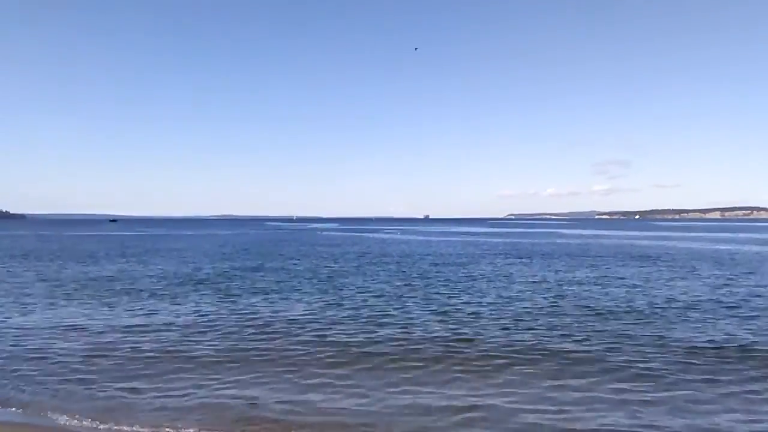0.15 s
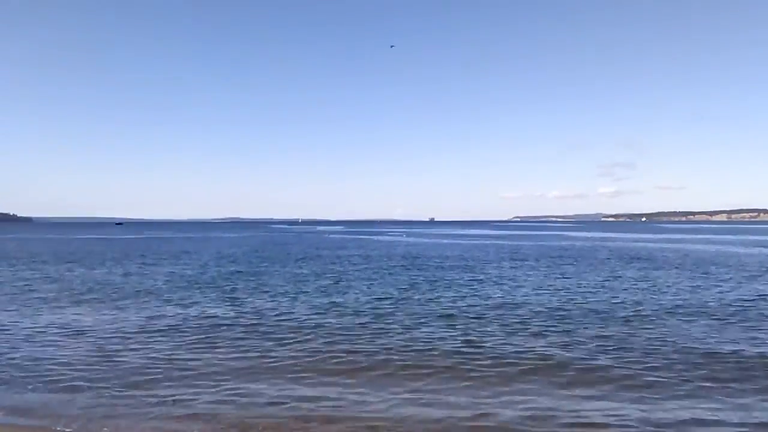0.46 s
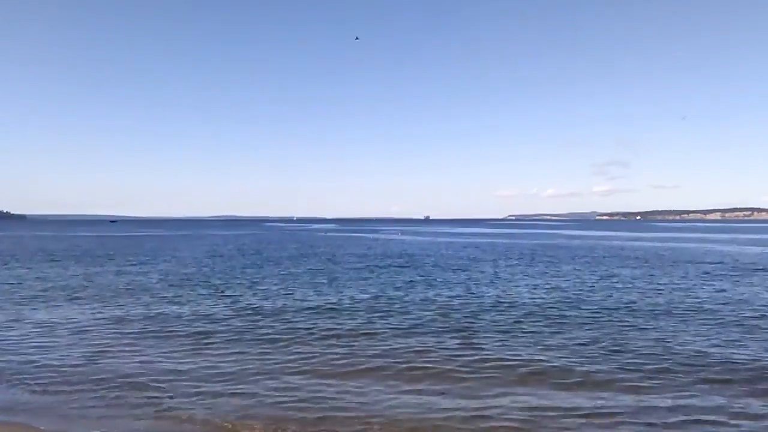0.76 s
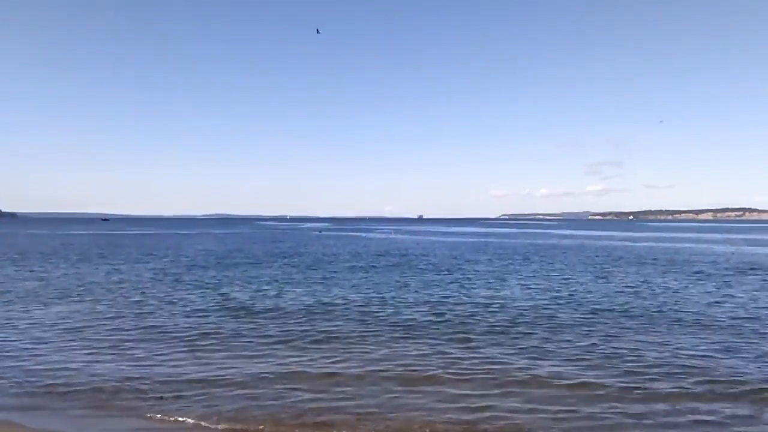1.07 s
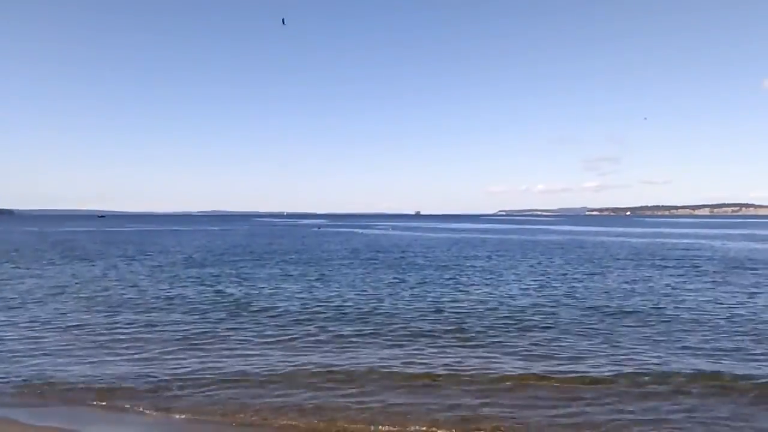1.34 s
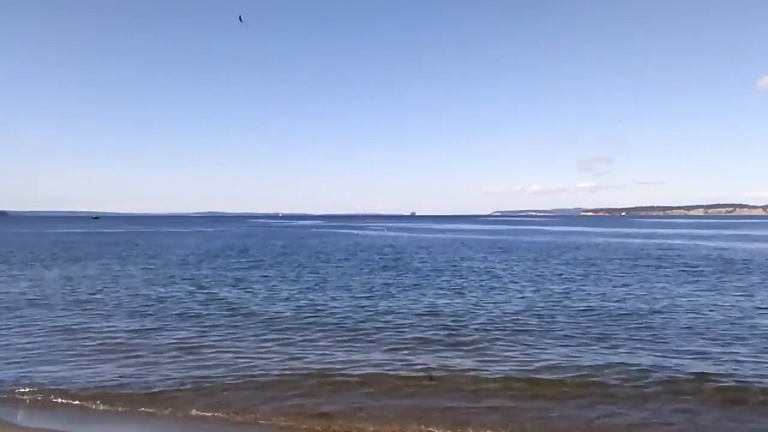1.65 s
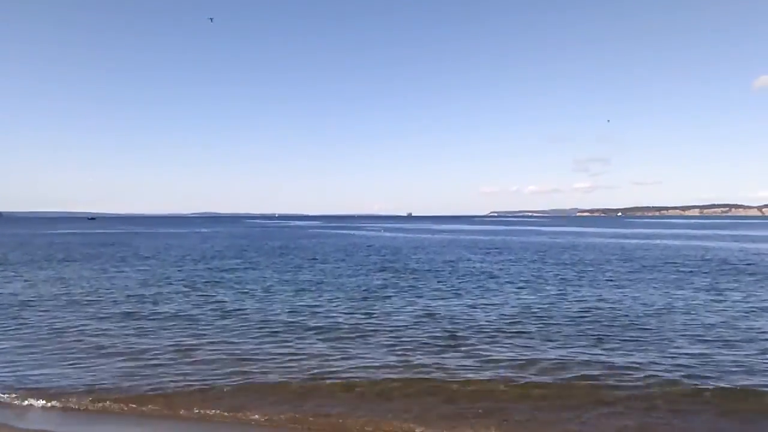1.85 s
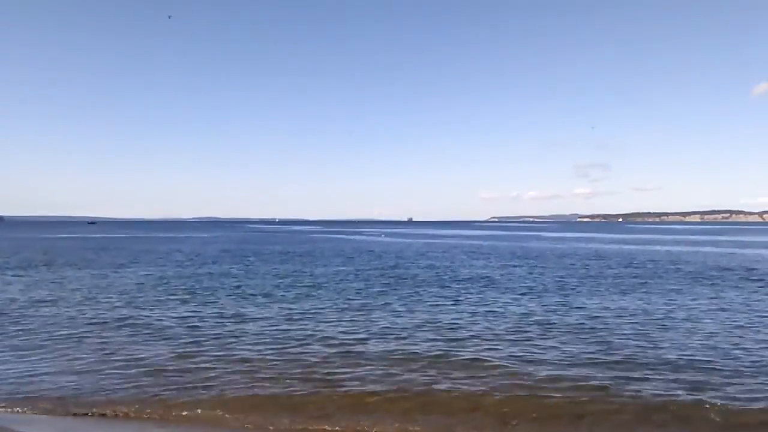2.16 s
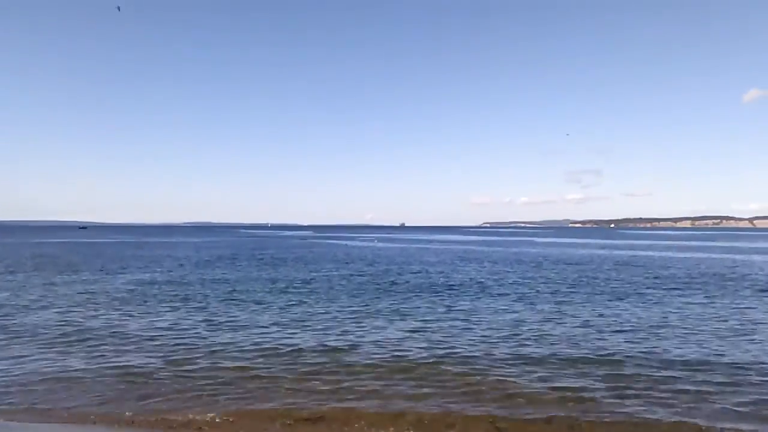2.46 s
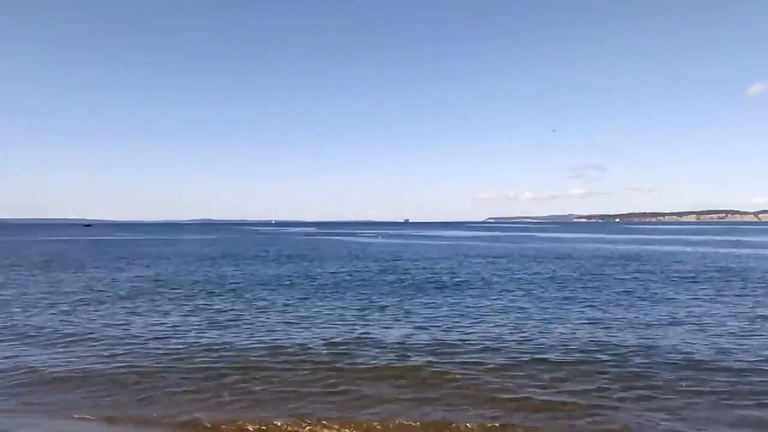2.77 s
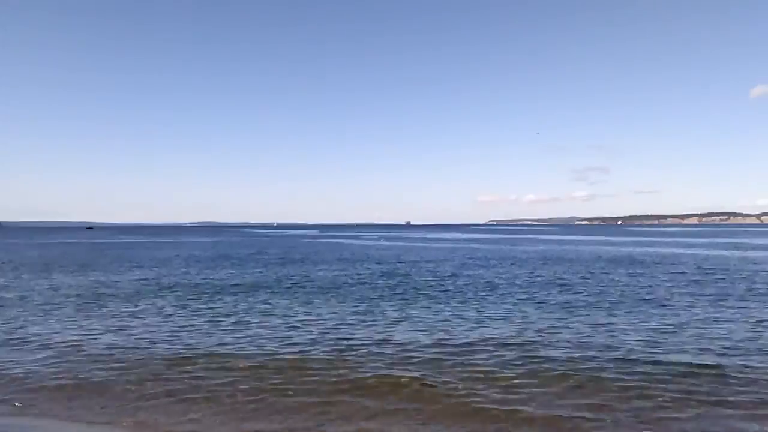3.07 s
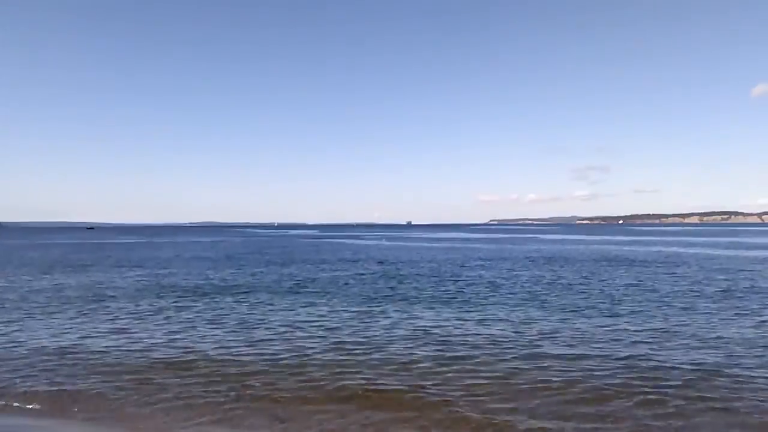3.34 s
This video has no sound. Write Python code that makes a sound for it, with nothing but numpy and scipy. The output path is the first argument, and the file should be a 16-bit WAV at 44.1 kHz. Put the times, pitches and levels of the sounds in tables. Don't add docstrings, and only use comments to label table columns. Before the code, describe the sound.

Foamy wavelets lap the shore in overlapping swells, the last and loudest near three seconds with plops and splashes; outdoors, hand-held stereo microphone at the water's edge, soft low wind buffeting.

```python
import sys
import numpy as np
from scipy import signal
from scipy.fft import rfft, irfft, next_fast_len
from scipy.io import wavfile
from scipy.ndimage import uniform_filter1d, map_coordinates

SR = 44100
rng = np.random.default_rng(int(sys.argv[2]) if len(sys.argv) > 2 else 0)


def store_pcm(level_fs):
    pcm = np.round(np.clip(level_fs, -1, 1) * 32767).astype(np.int16)
    wavfile.write(sys.argv[1], SR, np.atleast_2d(pcm).T)


def voltage_ratio(level):
    return 10 ** (np.asarray(level, float) / 20)


N = 154791
T = np.arange(N) / SR
HZ = np.fft.rfftfreq(next_fast_len(N + 4096), 1 / SR)

# left_lag_ms, strip_width_ms, sand_echo_0_to_1
WAVE_ANGLES = [(.285, .06, .35), (-.328, .345, .1), (-.345, .012, 0), (-.2, .26, .1)]
# port_ring_hz, fizz_db, bubbles_db
WAVE_PLACES = [(10890, -6, -4.5), (11370, -1.5, -1.5), (11100, -15.5, 0), (11440, -1.5, -4)]
# left_ms, left_share, right_ms, right_share
BODY_ECHOES = [(.178, .9, .0735, .8), (.1, .1, .19, .2), (.18, .05, .2, .3), (.1, .1, .19, .3)]


def wave(swell, span_s, angle, place, body):
    # freq_hz, level_db
    foam_colour = [(250, 7), (650, 6), (1050, 7), (1650, 8.5), (2600, 6.5), (5000, 2.5), (9500, -0.5),
                   (14500, -1)]
    sand_ms, edge_s = .092, 0.27
    s, level_db, bright_db = np.transpose(swell)
    lag_ms, width_ms, sand = angle
    ring_hz, fizz_db, bubbles_db = place

    since_start_s = T - s[0] + .5 * edge_s
    until_end_s = s[-1] - T + .5 * edge_s
    edge = np.clip(np.minimum(since_start_s, until_end_s) / edge_s, 0, 1)
    swelling = edge * voltage_ratio(np.interp(T, s, level_db))
    brightening = voltage_ratio(np.interp(T, s, bright_db))
    top = HZ ** 2 / (HZ ** 2 + 2400 ** 2)
    colour = voltage_ratio(read(foam_colour, HZ)) * (1 + sand * delay(sand_ms)) / (1 + .5 * sand)

    out = 0
    for place_on_strip in (-.5, -.1, .5):
        foam = hiss(2.43, 1.37, *span_s)
        foam = foam + voltage_ratio(fizz_db) * grains(2500, 12900, 2.11, 900, 3.1, count=8)
        foam = shaped(foam, colour)
        foam = foam + .3 * voltage_ratio(bubbles_db) * grains(450, 2600, 7, 90, 5, count=8)
        high = shaped(foam, top)
        foam = (foam - high + high * brightening) * swelling
        out = out + ports(foam, lag_ms + place_on_strip * width_ms, ring_hz, *body)
    return voltage_ratio(-4.5) * out


def hiss(patchy_db, flicker_db, from_s=0., to_s=9.):
    span = (T >= from_s) & (T <= to_s)
    z = signal.stft(rng.standard_normal(N)[span], nperseg=256)[2]
    frames = z.shape[1]
    patches = rng.standard_normal((129, frames))
    patches = uniform_filter1d(patches, size=3, axis=0)
    patches = evened(uniform_filter1d(patches, size=14, axis=1))
    flicker = evened(uniform_filter1d(rng.standard_normal(frames), size=8))
    z = z * voltage_ratio(patchy_db * patches + flicker_db * flicker)
    out = np.zeros(N)
    out[span] = evened(signal.istft(z, nperseg=256)[1][:span.sum()])
    return out


def grains(lo_hz, hi_hz, cycles, per_s, spread_db, count):
    out = np.zeros(N + SR)
    bubbles_per_pitch = int(per_s * N / SR / count)
    for hz in np.geomspace(lo_hz, hi_hz, count):
        when, luck = rng.random((2, bubbles_per_pitch, 1))
        one = bubble(hz, cycles, .12) * np.sqrt(hz)
        at = (when * N).astype(int) + np.arange(len(one))
        loudness = voltage_ratio(-spread_db * np.log(luck + 0.0091))
        out += np.bincount(at.ravel(), (loudness * one).ravel(), N + SR)
    return evened(out[:N])


def bubble(hz, cycles, glide):
    u = np.arange(0, 2.5, hz / cycles / SR)
    envelope = 3 * u * np.exp(1 - 3 * u)
    return np.sin(2 * np.pi * cycles * u * (1 + glide * u)) * envelope


def travel(pair, bent, scatter, drift_ms, low):
    # freq_hz, level_db, lag_rad
    bend_points = [(1400, 1, 0), (1960, 6.5, 1.38), (2510, 2, 1), (2820, 8.5, 1.15), (3900, 3.5, 1.16),
                   (5260, -4, 2.1), (7870, 9, 0), (12900, -6, 2.3)]
    # start_s, end_s
    run_s = (2.33, 2.81)
    hz, db, lag_rad = np.transpose(bend_points)
    low_lag_rad = low * 2 * HZ * 800 / (HZ ** 2 + 800 ** 2)
    bend_lag_rad = bent * read(np.c_[hz, lag_rad], HZ) + low_lag_rad
    bend = voltage_ratio(bent * read(np.c_[hz, db], HZ)) * np.exp(-1j * bend_lag_rad)

    ragged = uniform_filter1d(rng.standard_normal(len(HZ)), size=900)
    ragged = evened(uniform_filter1d(ragged, size=900))
    scattering = np.exp(1j * scatter * ragged * HZ ** 4 / (HZ ** 4 + 7000. ** 4))

    left, right = shaped(pair, np.array([bend, scattering]))
    if drift_ms:
        late_samples = np.interp(T, run_s, [0, drift_ms * 1e-3 * SR])
        left = map_coordinates(left, [np.arange(N) - late_samples], order=3)
    return np.array([left, right])


def nearby():
    # start_s, level_db, pitch_hz, ring_cycles
    single_bubbles = [(0.276, -51.5, 1023, 11), (0.294, -41, 1220, 2.1), (0.651, -43.5, 1510, 5.8),
                      (0.678, -46, 1670, 4.9), (1.253, -51, 1320, 3.2), (1.396, -34, 2350, 6.3),
                      (1.419, -40, 1420, 2.8), (1.612, -41, 1580, 6.8), (2.385, -47, 950, 3),
                      (2.402, -42, 1000, 1.9), (2.799, -36, 890, 2), (2.828, -36.5, 1410, 7.5),
                      (2.853, -59, 1780, 3.7), (2.879, -30.5, 1400, 1.2), (2.919, -32.5, 2210, 3),
                      (2.979, -38.5, 1880, 3.9), (3.005, -35, 1670, 4.6), (3.054, -41, 1710, 8.6),
                      (3.123, -26.5, 1930, 3), (2.909, -28, 4300, 3), (3.133, -35, 3200, 11),
                      (3.144, -37, 2980, 9.6), (2.83, -36, 4300, 5), (2.718, -39.5, 1090, 3.1)]
    # start_s, level_db, pitch_hz
    large_bubbles = [(.161, -50, 395), (.198, -67, 500), (1.4, -51.5, 702), (1.57, -52, 640),
                     (2.746, -39, 735), (2.76, -43.5, 675), (3.008, -46, 623), (3.136, -48, 604),
                     (3.149, -45, 552), (3.159, -46, 640), (3.192, -56, 610)]
    # start_s, level_db
    drop_hits = [(.093, -41), (1.564, -39), (1.601, -38), (2.116, -42), (2.199, -28), (2.314, -38),
                 (2.322, -35), (2.325, -33), (2.378, -29), (2.412, -39), (2.551, -37), (2.709, -36),
                 (2.808, -34), (3.104, -35), (3.161, -32), (3.447, -45)]
    # start_s, length_s, level_db
    splash_bursts = [(2.177, 0.054, -48), (2.312, 0.021, -43.5), (2.414, 0.037, -49), (2.81, 0.034, -45),
                     (2.914, 0.0045, -50), (3.121, 0.035, -46), (3.152, 0.028, -45)]
    drop_ms = 0.4
    far, near, beside = np.zeros((3, N))

    rings = [tuple(row) for row in single_bubbles] + [tuple(row) + (5.5,) for row in large_bubbles]
    for s, db, hz, cycles in rings:
        spot = far if s < 1.3 else near if s < 2.6 else beside
        add(spot, s, voltage_ratio(db - 1.5) * bubble(hz, cycles, 0.04))

    decay = np.exp(-np.arange(399) / SR * 1000 / drop_ms)
    for s, db in drop_hits:
        click = evened(np.diff(rng.standard_normal(400)))
        add(near if 2 < s < 2.6 else beside, s, voltage_ratio(db) * click * decay)

    for s, length_s, db in splash_bursts:
        z = rng.standard_normal((3, 4000))
        u = np.arange(0, 1, 1 / (length_s * SR))[:4000]
        lumps = voltage_ratio(3.5 * evened(uniform_filter1d(z[2], size=50)))
        spray = signal.lfilter([1, -.6], [1], z[:2] * lumps)
        spray = voltage_ratio(db) * np.sin(np.pi * u) * spray[:, :len(u)]
        add(near, s, spray[0] * (1 if s < 2.6 else .6))
        add(beside, s, spray[1] * (.4 if s < 2.6 else 1))

    return (ports(far, WAVE_ANGLES[0][0], WAVE_PLACES[0][0], *BODY_ECHOES[0])
            + ports(near, WAVE_ANGLES[2][0], 11450, *BODY_ECHOES[2])
            + ports(beside, -0.234, 11860, *BODY_ECHOES[3]))


def sea():
    # freq_hz, level_db
    surf_colour = [(40, 4), (120, 26), (300, 7), (1300, 11), (3000, 5.5), (6000, 6.5), (14500, 1)]
    colour = voltage_ratio(read(surf_colour, HZ))
    surf = sum(ports(shaped(hiss(1.5, .8), colour), lag_ms, 11300) for lag_ms in (-.33, -.1, .19))
    return voltage_ratio(-66) * surf


def wind():
    # time_s, level_db
    gusts = [(0.0, -67.5), (0.25, -65.5), (0.35, -76), (0.44, -59), (0.57, -81), (0.67, -62.5),
             (0.97, -73.5), (1.07, -67), (1.14, -76), (1.73, -70), (1.86, -64), (1.9, -62), (2.36, -62),
             (2.53, -74.5), (3.02, -60.5), (3.28, -69.5), (3.42, -65.5), (3.5, -69)]
    # freq_hz, level_db
    rumble_colour = [(28, -33), (40, -8), (52, 1.6), (90, -8.5), (160, -18), (300, -23), (600, -58)]
    # start_s, level_db, pitch_hz, fall_30db_s, snap_turns
    port_thumps = [(0.41, -61, 71, 0.018, 0.25), (0.464, -65, 71, 0.055, 0.68),
                   (0.712, -55.5, 69.5, 0.025, 0.77), (1.761, -54.5, 69.4, 0.021, 0.4),
                   (1.828, -58.5, 71, 0.12, 0.24), (1.926, -57, 70.4, 0.025, 0.26),
                   (2.118, -60, 69.5, 0.066, 0.16), (2.175, -53.5, 69.4, 0.045, 0.17),
                   (2.237, -55.5, 72.4, 0.083, 0.33), (2.326, -47.5, 69, 0.034, 0.68),
                   (2.356, -50.5, 71, 0.03, 0.3), (2.956, -54.5, 70.4, 0.015, 0.5),
                   (3.408, -71, 71, 0.068, 0.39)]
    gust_s, gust_db = np.transpose(gusts)
    a, b, lumps = rng.standard_normal((3, N))
    lumps = uniform_filter1d(uniform_filter1d(lumps, size=1500), size=1500)
    lumps = voltage_ratio(0.9 * evened(lumps))
    rumble = evened(shaped(np.array([a * lumps, b]), voltage_ratio(read(rumble_colour, HZ))))
    a, b = rumble * voltage_ratio(np.interp(T, gust_s, gust_db))

    thumps, t = np.zeros(N), T[:6000]
    for s, db, hz, fall_30db_s, snap in port_thumps:
        turns = hz * t + snap * (1 - np.exp(-t / .002))
        add(thumps, s, voltage_ratio(db + 17 - 30 * t / fall_30db_s) * np.sin(2 * np.pi * turns))

    left = voltage_ratio(9.5) * a + thumps
    right = voltage_ratio(3.5) * (0.78 * b - 0.72 * a) - voltage_ratio(-25) * thumps
    return np.array([left, right])


def ports(x, lag_ms, ring_hz, left_ms=.1, left=0., right_ms=.1, right=0.):
    # freq_hz, level_db
    right_colour = [(100, 0), (2000, -3.5), (4000, -1), (6000, -0.6), (9700, 3.3), (11500, -8),
                    (13500, -11), (14500, -42)]
    ring_width_hz = 990 * np.where(HZ > ring_hz, 1.4, 1)
    ring = voltage_ratio(13 * np.exp(-((HZ - ring_hz) / ring_width_hz) ** 2))
    left_echo = left * delay(left_ms) / (1 + (HZ / 8000) ** 4)
    left_port = ring * delay(1 + lag_ms) * (1 + left_echo)
    right_port = -voltage_ratio(read(right_colour, HZ)) * delay(1) * (1 + right * delay(right_ms))
    return shaped(x, np.array([left_port, right_port]))


def delay(ms):
    return np.exp(-2j * np.pi * 1e-3 * ms * HZ)


def shaped(x, gain):
    size = 2 * len(HZ) - 2
    return irfft(rfft(x, size) * gain, size)[..., :N]


def read(points, hz):
    f, value = np.transpose(points)
    return np.interp(np.log(hz + 1), np.log(f + 1), value)


def evened(x):
    return x / np.sqrt(np.mean(x ** 2) + 1e-20)


def add(mix, s, sound):
    part = mix[round(s * SR):][:len(sound)]
    part += sound[:len(part)]


def starve(pair, under_other_db, under_own_db):
    z = signal.stft(pair, nperseg=2048)[2][:, :1024]
    power = (abs(z) ** 2).reshape(2, 128, 8, -1).mean(2)
    power = uniform_filter1d(power, size=2, axis=1)
    level = 10 * np.log10(abs(power) + 1e-20)
    under_other = level < level[::-1] - under_other_db
    under_own = level < uniform_filter1d(level, size=15, axis=1) - under_own_db
    empty = under_other | under_own
    empty[:, :9] = False
    z = np.pad(z * np.repeat(~empty, 8, axis=1), ((0, 0), (0, 1), (0, 0)))
    return signal.istft(z, nperseg=2048)[1][:, :N]


def scene():
    # time_s, level_db, top_brightness_db
    swells = [
        [(0.0, -69, 6), (0.184, -52, -3.5), (0.39, -55, 0), (0.64, -51, 1.5), (1.3, -56.5, -5)],
        [(1.15, -54.5, 1), (1.176, -55.5, -9.5), (1.436, -51, -2), (1.72, -50.5, -5), (2.15, -61.5, 0.5)],
        [(1.95, -63, -26), (2.12, -54, 1), (2.5, -60, 8), (2.7, -54, 5.5), (2.8, -46.5, -1.5)],
        [(2.5, -67.5, 3.5), (2.824, -46.5, 0.5), (3.15, -46, -2), (3.432, -61, -7), (3.5, -48.5, -26)],
    ]
    # start_s, end_s
    spans = [(0, 1.55), (.9, 2.4), (1.6, 3.05), (2.25, 3.6)]
    # bent_share, top_scatter_rad, lag_drift_ms, low_lag_rad
    paths = [(1, 1.2, 0, -.5), (0, .5, 0, .8), (0, .3, .05, .1), (0, 2.6, 0, .6)]
    washes = map(wave, swells, spans, WAVE_ANGLES, WAVE_PLACES, BODY_ECHOES)
    waves = sum(travel(wash, *path) for wash, path in zip(washes, paths))
    return waves + nearby() + sea() + wind()


def roll_off(x):
    return signal.sosfilt(signal.butter(12, 14450, fs=SR, output="sos"), x)


def record(dry):
    turn = np.array([[1, 0.99], [1, -0.89]]) / np.sqrt(2)
    x = shaped(dry, 1 / (1 + (HZ / 14520) ** 120))
    mid_side = starve(turn @ x, np.array([6, 9])[:, None, None], 99)
    x = starve(turn @ mid_side, 17, 5)
    return roll_off(x)


dry = scene()
out = record(dry)
store_pcm(out)
```